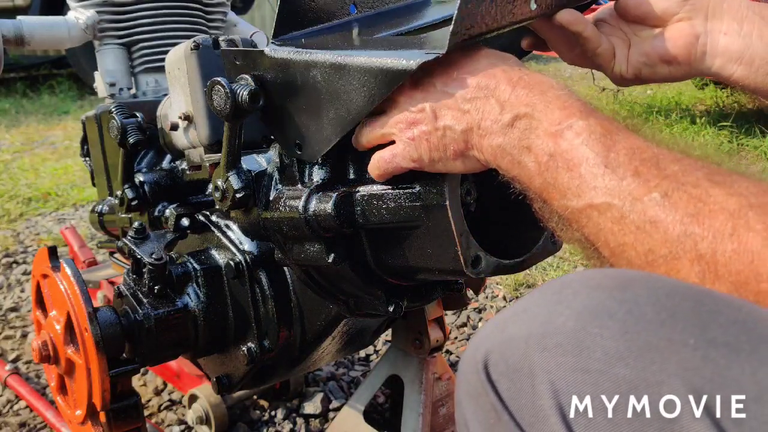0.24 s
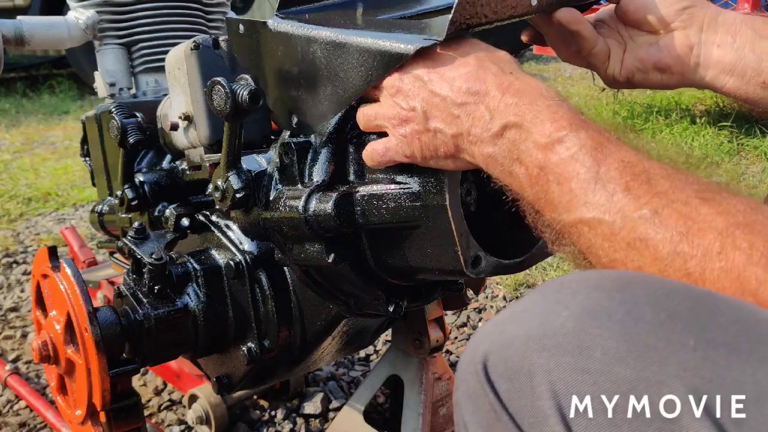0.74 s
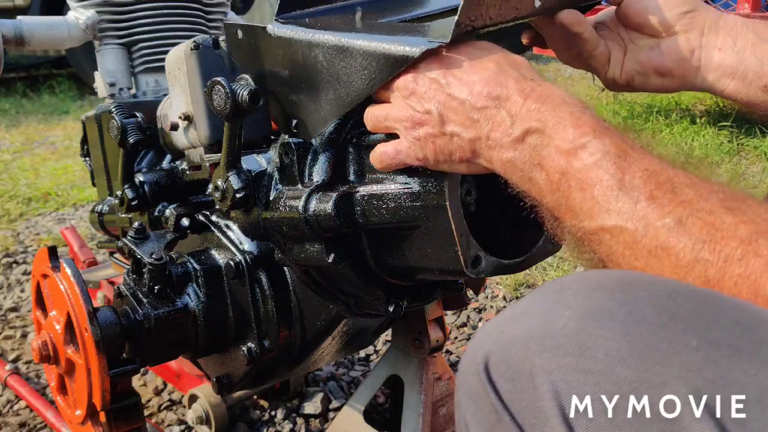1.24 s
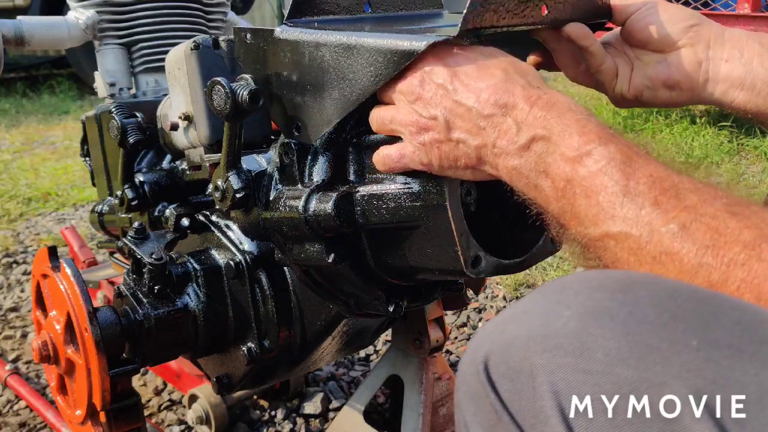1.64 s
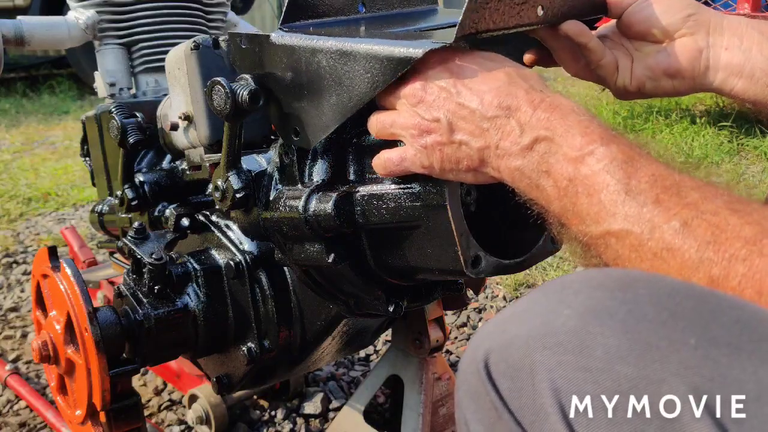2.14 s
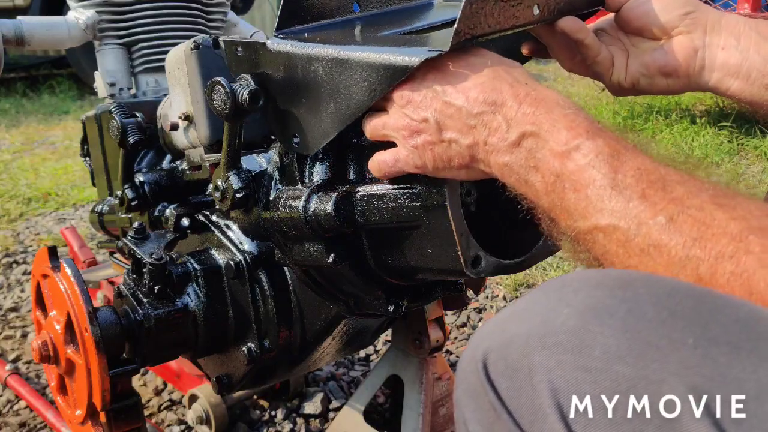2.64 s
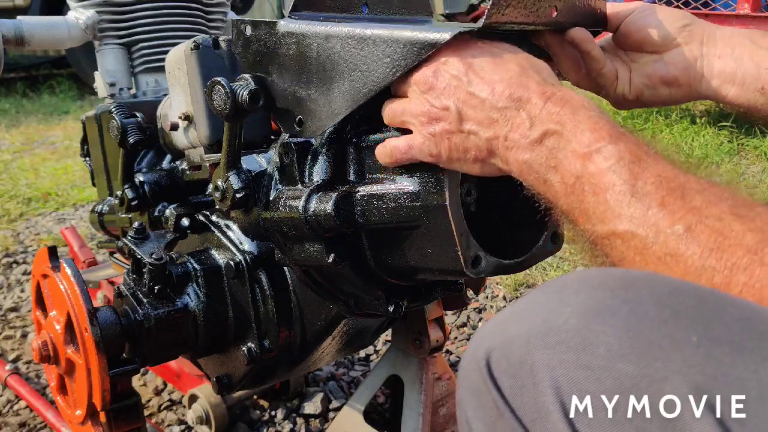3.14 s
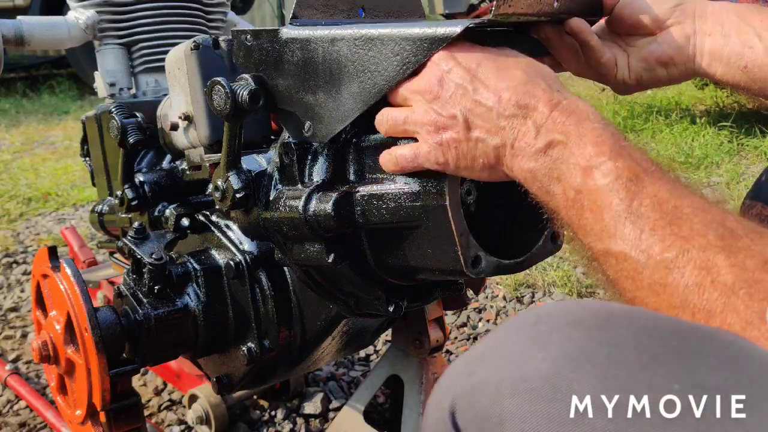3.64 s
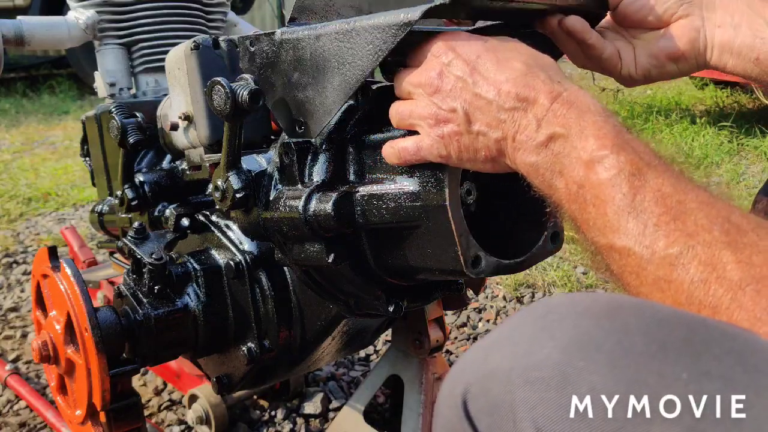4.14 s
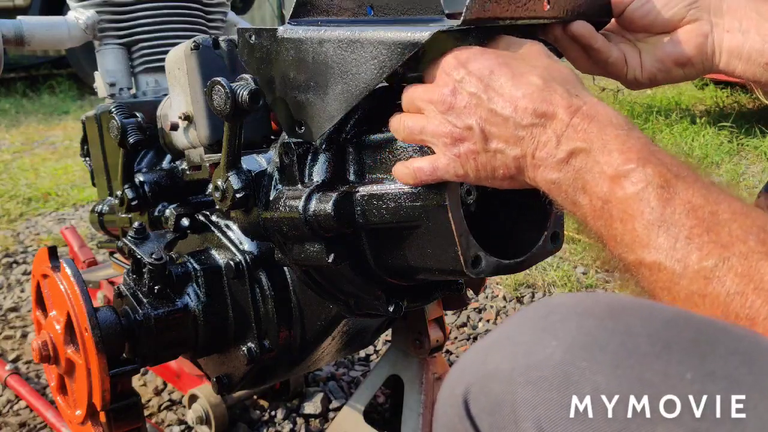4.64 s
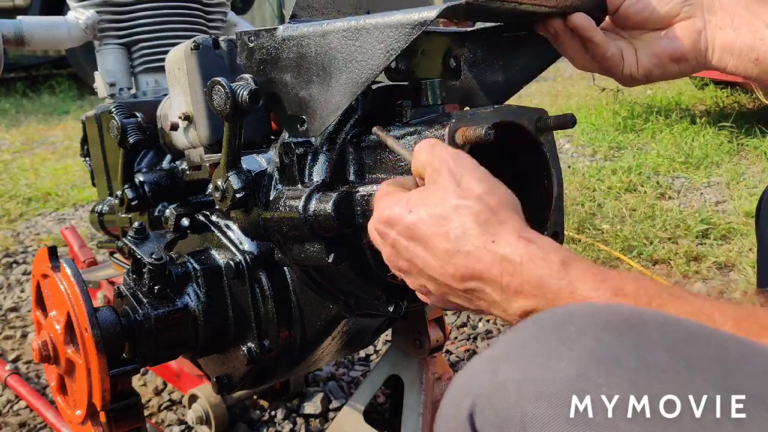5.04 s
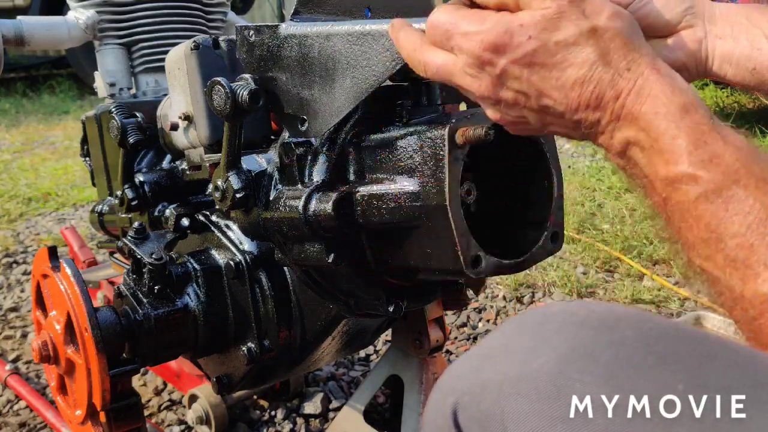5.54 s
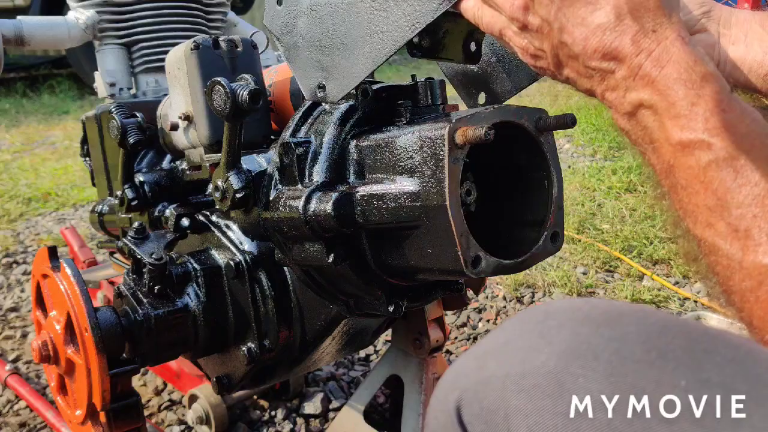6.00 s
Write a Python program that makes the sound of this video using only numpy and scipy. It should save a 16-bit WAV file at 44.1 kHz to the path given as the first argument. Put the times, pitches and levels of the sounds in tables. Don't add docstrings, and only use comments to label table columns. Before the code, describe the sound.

A summer yard with chirping crickets and low road rumble, a passing engine sliding down in pitch, and sparse metal clinks, knocks and tiny bolt ticks.

```python
import sys
import numpy as np
from scipy import signal
from scipy.fft import rfft, irfft, next_fast_len
from scipy.io import wavfile
from scipy.ndimage import uniform_filter1d

SR = 44100
rng = np.random.default_rng(int(sys.argv[2]) if len(sys.argv) > 2 else 0)


def attenuation_scalar(level_db):
    decades = np.asarray(level_db, float) / 20
    return 10 ** decades


def wav_out(sig):
    wavfile.write(sys.argv[1], SR, np.round(np.clip(np.atleast_2d(sig).T, -1, 1) * 32767).astype(np.int16))


N = 276507


def in_time(rows):
    seconds, *columns = np.transpose(rows)
    return [np.interp(np.arange(N) / SR, seconds, column) for column in columns]


def rms_one(x):
    return x / np.sqrt(np.mean(x ** 2) + 1e-20)


def drift(rate):
    r = np.exp(-80 * np.pi * rate / SR)
    slow = signal.lfilter([1], [1, -2 * r, r * r], rng.standard_normal(N // 40 + 2002))[2000:]
    return np.interp(np.arange(N) / 40, np.arange(len(slow)), rms_one(slow - slow.mean()))


def ring(clicks, hz, t60):
    r, w = attenuation_scalar(-60 / (t60 * SR)), 2 * np.pi * hz / SR
    return signal.lfilter([0, np.sin(w)], [1, -2 * r * np.cos(w), r * r], clicks + 1e-18)


def ringing_noise(white, hz, t60):
    return rms_one(ring(ring(white, hz, t60), hz, t60))


def band(noise, low_hz, high_hz, order=2):
    return signal.sosfilt(signal.butter(order, [low_hz, high_hz], "band", fs=SR, output="sos"), noise)


def coloured(spectrum, patchy_db):
    size = next_fast_len(N)
    hz, level_db = np.transpose(spectrum)
    log_hz = np.log(np.fft.rfftfreq(size, 1 / SR) + 1)
    shape = attenuation_scalar(np.interp(log_hz, np.log(hz), level_db, left=-90, right=-90))
    noise = irfft(rfft(rng.standard_normal(size)) * shape, size)[:N]
    return rms_one(noise * attenuation_scalar(patchy_db * drift(6)))


def add(out, sound, at):
    low, high = max(at, 0), min(at + len(sound), N)
    out[low:high] += sound[low - at:high - at]


# delay in ms, level in dB.
YARD_ECHOES = [(12, -14.5), (27, -20), (41, -29), (63, -27), (88, -33)]


def yard(x):
    out = x.copy()
    for ms, level_db in YARD_ECHOES:
        add(out, attenuation_scalar(level_db) * x, round(ms * SR / 1000))
    return out


# multiple of the pitch, level in dB.
WING_OVERTONES = [(2, -19), (3, -28)]


def stroke(length_ms, hz, drop, tail_db):
    size, blip = round(length_ms * SR / 1000 * 1.09), round(0.0056 * SR)
    u = np.arange(size + blip) / size
    onset = np.clip(u / .03, 0, 1)
    growth = 0.19 + 0.82 * np.clip(u / 0.66, 0, 1) ** 1.06
    release = np.sin(np.pi / 2 * np.clip((1 - u) / 0.19, 0, 1))
    swell = onset * growth * release
    swell[size:] = -attenuation_scalar(tail_db) * np.hanning(blip)
    phase = 2 * np.pi * np.cumsum(hz * (1.012 - drop * u ** 3.27)) / SR
    tone = np.sin(phase)
    for multiple, level_db in WING_OVERTONES:
        tone += attenuation_scalar(level_db) * np.sqrt(abs(swell)) * np.sin(multiple * phase)
    return swell * tone


# end in seconds, length in ms,
# peak in dB, pitch in Hz.
NEAR_STROKES = [(0.035, 31, -37.5, 4050), (0.151, 23.4, -46, 3986), (0.2, 22, -41.6, 4013),
                (0.215, 11.6, -56, 3880), (0.263, 21.7, -51, 3989), (0.309, 19, -50.5, 4040),
                (0.362, 20.2, -48, 4028), (0.431, 8.3, -49.4, 4031), (0.702, 8.5, -53, 4200),
                (0.807, 13.2, -47, 4000), (0.846, 22, -37.2, 4060), (0.868, 9.7, -55, 4015),
                (0.894, 21, -35.3, 4060), (0.916, 8.7, -48, 4180), (0.945, 21, -36.4, 4052),
                (1.332, 22.3, -53, 4001), (1.382, 14, -47, 3920), (1.428, 13, -39.8, 3974),
                (1.483, 11.6, -52, 3957), (1.52, 20, -38, 4041), (1.543, 8.8, -56, 3920),
                (1.569, 23, -36, 4070), (1.62, 23, -35.5, 4070), (2.026, 19.5, -56, 3994),
                (2.052, 18, -53, 3928), (2.093, 14.4, -40.5, 3950), (2.129, 24.4, -50.7, 4029),
                (2.415, 15.2, -51, 3927), (2.461, 20, -41.5, 3910), (2.481, 24, -37.5, 4040),
                (2.504, 16, -49, 4000), (2.526, 23, -36, 4050), (2.557, 12.3, -48.7, 3955),
                (2.58, 22, -36.3, 4060), (2.608, 17.3, -53, 3960), (2.757, 21, -50, 3930),
                (2.8, 11, -38.5, 3990), (2.862, 21, -54, 3961), (2.92, 23.7, -53, 3991),
                (3.121, 8, -44, 4055), (3.141, 12.4, -32, 4100), (3.191, 21, -33.5, 4060),
                (3.248, 24, -34, 4060), (3.558, 14, -48.4, 3915), (3.612, 24, -42.5, 4020),
                (3.789, 27, -51, 3999), (3.816, 10.1, -46.1, 4001), (3.855, 28, -37.5, 4080),
                (3.901, 27, -35.5, 4070), (3.936, 14, -51, 4065), (3.957, 22.2, -34, 4080),
                (3.986, 12, -38, 3970), (4.17, 14, -51, 4115), (4.314, 14, -46.5, 4020),
                (4.362, 13, -39.5, 3930), (4.473, 17, -54, 4002), (4.523, 25.7, -49.5, 3980),
                (4.57, 21, -36.5, 4080), (4.62, 23, -36.5, 4045), (4.645, 12.2, -60, 4000),
                (4.672, 21, -36, 4072), (4.698, 15.5, -50, 3974), (4.733, 22, -45.5, 4032),
                (5.081, 16, -47, 3910), (5.122, 17, -36, 4070), (5.167, 26, -35.5, 4060),
                (5.221, 27, -36, 4058), (5.243, 28, -61, 4040), (5.355, 20, -50, 3988),
                (5.405, 23, -48.5, 4001), (5.457, 33, -49.5, 4036), (5.785, 11.5, -50.9, 3969),
                (5.822, 22, -39.1, 4040), (5.872, 27, -38.5, 4063), (5.921, 28, -38.5, 4079),
                (5.968, 20.1, -50, 3995), (6.018, 22.4, -50.6, 4017),
                (1.778, 19, -38, 3970), (6.6, 13.8, -40, 3900), (4.122, 31, -58, 5400),
                  (3.68, 27, -57, 3700), (1.8, 22, -53, 3500), (6.175, 18, -48.5, 4000),
                  (3.136, 11.35, -37, 4090), (3.105, 15, -49, 3960), (.76, 22, -57, 4130),
                  (1.2, 22, -56, 4080), (2.65, 22, -56, 3700)]


def crickets():
    out = np.zeros(N)
    for end_s, length_ms, peak_db, hz in NEAR_STROKES:
        tone = stroke(length_ms, hz, drop=0.046, tail_db=-6.5)
        add(out, attenuation_scalar(peak_db) * tone, round((end_s - length_ms / 1000) * SR))
    return yard(out)


# time in seconds, level in dB.
TRILL_LEVEL = [(0.0, -66), (0.03, -60.5), (0.38, -66), (0.42, -58), (0.56, -53.5), (0.57, -60), (0.73, -69),
               (0.87, -55.5), (1.01, -55.5), (1.15, -64), (1.19, -58), (1.29, -70), (1.5, -74), (1.55, -55),
               (1.62, -55), (1.97, -77), (2.08, -69), (2.13, -59), (2.23, -54), (2.34, -76.5), (2.53, -69),
               (2.78, -65), (2.85, -74), (2.88, -56), (3.0, -57), (3.09, -80), (3.12, -61), (3.16, -65),
               (3.18, -65), (3.21, -63), (3.23, -62), (3.3, -75), (3.35, -56), (3.46, -55.5), (3.56, -71),
               (3.72, -66), (3.95, -61), (4.02, -80), (4.14, -71), (4.16, -66), (4.57, -77), (4.61, -61),
               (4.73, -56.5), (4.77, -63), (4.92, -81), (4.94, -60), (4.96, -57), (5.22, -62), (5.26, -74),
               (5.32, -81), (5.38, -63), (5.48, -54.5), (5.59, -75), (5.75, -68), (5.81, -53),
               (5.92, -55.5), (5.97, -76), (6.13, -66), (6.16, -61), (6.27, -53)]


def trill():
    out = np.zeros(N)
    for hz in (4350, 4410, 4480):
        timing, pitch, size = rng.standard_normal((3, 300))
        starts = np.cumsum(.0245 * (1 + 0.087 * timing))
        for start, bend, size_now in zip(starts[starts < N / SR], pitch, size):
            tone = stroke(16, hz * (1 + .005 * bend), drop=.025, tail_db=-8)
            add(out, attenuation_scalar(2.5 * size_now) * tone, round(start * SR))
    return attenuation_scalar(in_time(TRILL_LEVEL)[0]) * rms_one(yard(out))


# frequency in Hz, level in dB per Hz.
CHORUS_SPECTRUM = [(2060, -54), (3500, -14.5), (4180, 0), (5560, -0.5), (6000, -5.5), (6480, -2.5),
                   (7310, -4.5), (7940, -4.5), (11000, -21), (15100, -14.5), (16000, -25)]
# pitch in Hz, width in Hz, level in dB.
FAR_SONGS = [(5620, 99, -73), (8050, 210, -72.5), (6280, 80, -76.5), (4703, 96, -75)]


def chorus():
    white = rng.standard_normal(N)
    out = attenuation_scalar(-59 + 0.17) * coloured(CHORUS_SPECTRUM, .4)
    for hz, width, level_db in FAR_SONGS:
        out += attenuation_scalar(level_db + 4.5 * drift(2.7)) * ringing_noise(white, hz, 2.1 / width)
    return out


def drone(hz, level_db, flutter_db, span=(-1, 9)):
    t = np.arange(N) / SR
    heard = np.clip(np.minimum(t - span[0], span[1] - t) / 0.47, 0, 1)
    phase = 2 * np.pi * np.cumsum(hz) / SR + 0.51 * drift(1.93)
    return np.sqrt(2) * heard * attenuation_scalar(level_db + flutter_db * drift(3.4)) * np.sin(phase)


# time in seconds, half-order pitch in Hz, firing level in dB,
# half-order level in dB.
LORRY_PASS = [(0, 59, -43.5, -47), (.8, 58.3, -46, -50), (1.3, 57, -45.5, -42.5), (1.6, 56.3, -41, -45),
              (2.1, 55.3, -37.5, -40), (2.8, 54.7, -36, -54), (3.1, 54.4, -31, -37), (3.3, 53.3, -34, -46),
              (3.46, 50.5, -36.5, -46), (3.6, 48.8, -31.5, -43), (3.8, 48.1, -33.5, -49),
              (4.07, 47.6, -29.5, -40), (4.35, 47.3, -34, -47), (4.5, 47.1, -40, -42),
              (4.9, 46.7, -40, -45), (5.5, 46.3, -45, -42.5), (6.27, 45.8, -48, -46)]


def lorry():
    half_hz, firing_db, half_db = in_time(LORRY_PASS)
    return drone(2 * half_hz, firing_db, 0.67) + drone(half_hz, half_db, 3.9)


# start in seconds, end in seconds,
# first pitch in Hz, last pitch in Hz, first level in dB, last level in dB.
OTHER_ENGINES = [(-.3, 1.08, 100, 96, -32.5, -46.5), (0.9, 2.94, 93.5, 91, -45.5, -34.5),
                 (3.5, 6.1, 130, 123, -43.5, -46), (0.66, 1.51, 126, 124, -44, -44.5),
                 (3, 4.7, 156, 143, -50, -44.5), (0.5, 3.13, 181, 200, -51, -49),
                 (-0.67, 2.4, 226, 224, -52, -50.5), (-0.8, 1.8, 197, 196, -54, -46.5),
                 (2.5, 3.8, 201, 197, -44, -54), (5.7, 9.3, 198, 220, -50.5, -47.5),
                 (5, 5.8, 203, 188, -47.5, -54.5), (2, 3.61, 290, 285, -55.5, -58),
                 (-0.1, 1.25, 332, 300, -60, -62)]


def other_engines():
    out = np.zeros(N)
    for start, end, first_hz, last_hz, first_db, last_db in OTHER_ENGINES:
        hz, level_db = in_time([(start, first_hz, first_db), (end, last_hz, last_db)])
        out += drone(hz, level_db, 2.5, span=(start, end))
    return out


# time in seconds, rumble level in dB, tyre roar level in dB.
WASH_LEVELS = [(0.0, -43, -48.5), (0.37, -44, -49), (0.56, -40.5, -49.5), (0.91, -42, -49.5),
               (1.29, -42.5, -50.5), (1.9, -45, -50.5), (2.65, -42, -51), (3.49, -42.5, -52),
               (4.09, -46.5, -53.5), (4.26, -44, -52.5), (4.7, -43.5, -53), (5.41, -44.5, -52.5),
               (5.62, -45, -53.5), (6.27, -46.5, -54.5)]
# frequency in Hz, level in dB per Hz.
RUMBLE_SPECTRUM = [(12, -37), (20, -9.5), (113, -3.5), (450, -28.5), (580, -70), (990, -120)]
# frequency in Hz, level in dB per Hz.
ROAR_SPECTRUM = [(240, -39), (400, -5.5), (544, -2), (797, 1), (1180, -3.5), (1630, -2), (3220, -13),
                 (3700, -16), (4810, -40), (8140, -120)]


def road_wash():
    rumble_db, roar_db = in_time(WASH_LEVELS)
    rumble = attenuation_scalar(rumble_db + 5) * coloured(RUMBLE_SPECTRUM, 0.48)
    return rumble + attenuation_scalar(roar_db - 0.41) * coloured(ROAR_SPECTRUM, 0.47)


# start in seconds, length in ms, hiss in dB, wing ring in dB, low ring in dB.
KATYDID_RASPS = [
    (.26, 77, -72, -62, -59),
    (.54, 90, -80, -69, -80),
    (.80, 150, -63, -64.5, -58),
    (2.44, 140, -67, -66.5, -64),
    (4.13, 64, -64.5, -65, -75),
    (5.66, 66, -66, -70, -74),
]
# pitch in Hz, width in Hz, level in dB.
WING_RESONANCES = [(8210, 150, 5), (9400, 140, -4.5), (5200, 740, 5)]


def katydid():
    white, out = rng.standard_normal(N), np.zeros(N)
    hiss = rms_one(signal.sosfilt(signal.butter(2, 5000, "high", fs=SR, output="sos"), white))
    wing = sum(attenuation_scalar(db) * ringing_noise(white, hz, 1.6 / width) for hz, width, db in WING_RESONANCES)
    low = ringing_noise(white, 2300, 0.026)
    for start, length_ms, hiss_db, wing_db, low_db in KATYDID_RASPS:
        at = round(start * SR)
        shape = np.hanning(round(length_ms * SR / 1000)) ** 0.43
        rasp = attenuation_scalar(hiss_db) * hiss + attenuation_scalar(wing_db) * wing + attenuation_scalar(low_db) * low
        add(out, shape * rasp[at:at + len(shape)], at)
    return out


# start in seconds, peak in dB, brightest pitch in Hz,
# share of the ring left by the hand, clatter in dB.
COVER_CLINKS = [(0.4249, -38, 2400, 0.81, -5), (1.7684, -26, 2220, 0.85, -13),
                (1.7744, -26.5, 2040, 0.93, -14.5), (1.7864, -33, 2030, 0.62, -10),
                (1.9111, -37, 1070, 1, -2), (3.0814, -37.5, 2080, 0.7, -11), (3.0924, -31.5, 980, 0.64, -6),
                (3.1118, -30.5, 2900, 0.65, -10), (3.1204, -39, 1040, 0.64, -9),
                (3.1284, -46, 985, 0.7, -9), (3.1404, -39.5, 1430, 0.7, -16), (3.4356, -43, 2110, 0.7, -8),
                (3.913, -39, 1100, 0.75, 8), (4.6972, -42.5, 2070, 1, -2), (5.2194, -48, 1420, 0.64, -6),
                (5.6884, -46, 902, 0.89, -3), (5.6994, -44.5, 1440, 0.56, 2)]
# pitch in Hz, level in dB, t60 in seconds.
COVER_MODES = [(600, -1, 0.096), (890, -8, 0.084), (3160, -15, .05), (980, -7, 0.23), (1113, -2.5, 0.13),
               (1207, -3.5, 0.1), (1425, -4, 0.23), (1650, -7, 0.071), (1814, -8.5, 0.11),
               (2050, -3.5, 0.27), (2122, -1.5, 0.16), (2295, -3.5, 0.072), (2330, -11.5, 0.088),
               (2580, -14.5, 0.12), (2770, -3, 0.064), (2883, -3, 0.064), (4750, -14, 0.054),
               (5270, -10, 0.036), (8200, -16, .03)]


def cover():
    out, t = np.zeros(N), np.arange(11000) / SR
    hz, level_db, t60 = np.transpose(COVER_MODES)[:, :, None]
    for start, peak_db, bright_hz, share, clatter_db in COVER_CLINKS:
        size, lag = rng.standard_normal((2, len(COVER_MODES), 1))
        struck_db = level_db + 1.9 * size - 4 * np.log2(hz / bright_hz) ** 2
        modes = attenuation_scalar(struck_db - 8 - 60 * t / (t60 * share)) * np.sin(2 * np.pi * hz * t + .5 * lag)
        grit = band(rng.standard_normal(len(t)), bright_hz / 3.5, bright_hz * 2.3)
        clatter = attenuation_scalar(clatter_db - 60 * t / 0.069) * grit
        onset = np.minimum(t / 0.00044, 1)
        add(out, attenuation_scalar(peak_db) * (modes.sum(axis=0) + clatter) * onset, round(start * SR))
    return out


# start in seconds, peak in dB, pitch in Hz.
CASTING_KNOCKS = [
    (0.425, -40.5, 600),
    (1.561, -39, 620),
    (1.768, -40, 580),
    (3.347, -44.5, 600),
    (4.457, -39, 445),
]


def knocks():
    out, t = np.zeros(N), np.arange(2200) / SR
    for start, peak_db, hz in CASTING_KNOCKS:
        tone = attenuation_scalar(peak_db - 0.5 - 60 * t / .07) * np.sin(2 * np.pi * hz * t)
        grit = band(rng.standard_normal(len(t)), hz / 1.8, hz * 2.4)
        thud = attenuation_scalar(peak_db + 11.5 - 60 * t / 0.054) * grit
        add(out, tone + thud, round(start * SR))
    return out


# start in seconds, peak in dB, body ring in dB.
BOLT_TICKS = [(0.6459, -55, -54), (2.0896, -62, -58), (3.6721, -54, -46), (3.7024, -49, -48),
              (3.9169, -61, -61), (3.9708, -50, -59), (4.162, -59, -52), (4.2594, -52, -60),
              (4.3794, -57, -58), (5.0937, -53, -50), (5.1321, -50, -46), (5.238, -50, -53),
              (5.2613, -57, -62), (5.7003, -50, -46)]


def bolt():
    out, t = np.zeros(N), np.arange(2200) / SR
    shank = np.sin(2 * np.pi * 5050 * t) + np.sin(2 * np.pi * 5480 * t)
    for start, peak_db, ring_db in BOLT_TICKS:
        grit = band(rng.standard_normal(len(t)), 5000, 14000, order=1)
        crack = attenuation_scalar(peak_db - 3 - 60 * t / 0.033) * grit
        add(out, crack + attenuation_scalar(ring_db - 60 * t / 0.032) * shank, round(start * SR))
    return out


def scene():
    insects = crickets() + trill() + chorus() + katydid()
    road = lorry() + other_engines() + road_wash()
    handwork = yard(cover() + knocks() + bolt())
    return (insects + road + handwork)[None]


def thin_treble(x):
    hz, _, cells = signal.stft(x, SR, nperseg=2048)
    power = uniform_filter1d(abs(cells) ** 2, size=5, axis=1)
    power = uniform_filter1d(power, size=2, axis=2)
    keep_db = np.interp(hz, [7500, 10000, 14900, 15100], [-9, -2.2, -1.2, 2])[:, None]
    weak = power < np.median(power, axis=2, keepdims=True) * attenuation_scalar(keep_db) ** 2
    return signal.istft(cells * np.where(weak, .06, 1), SR, nperseg=2048)[1][:, :N]


def band_limit(x):
    return signal.sosfilt(signal.butter(12, 16100, fs=SR, output="sos"), x)


def record(dry):
    mix = thin_treble(dry)
    return band_limit(mix)


dry = scene()
out = record(dry)
wav_out(out)
```